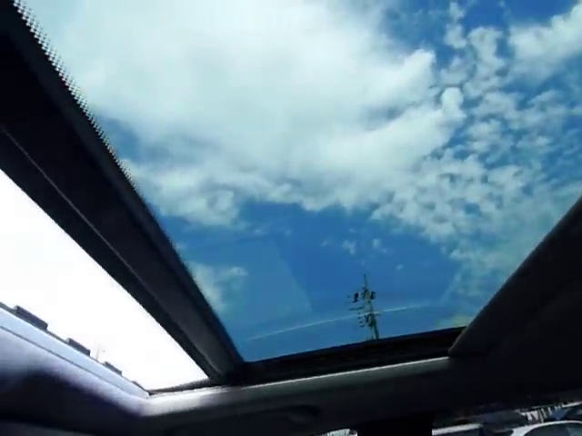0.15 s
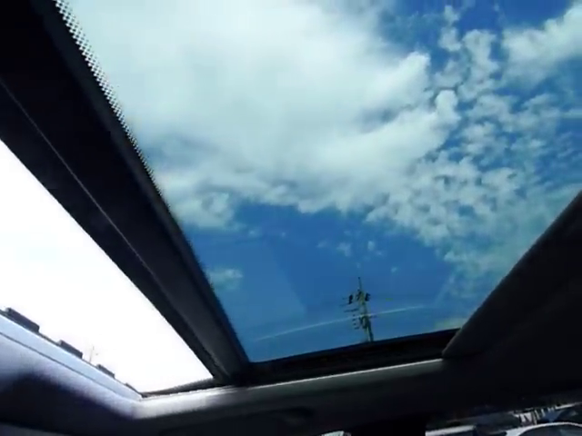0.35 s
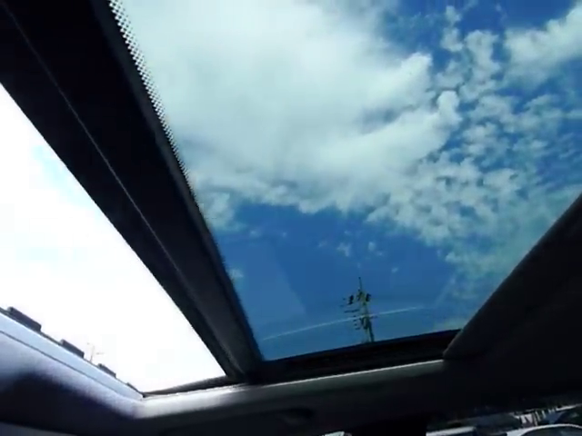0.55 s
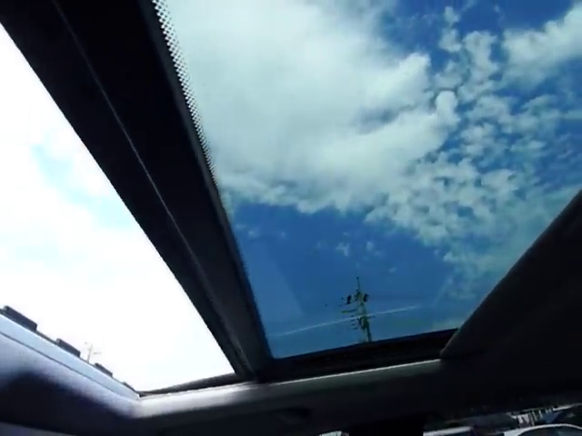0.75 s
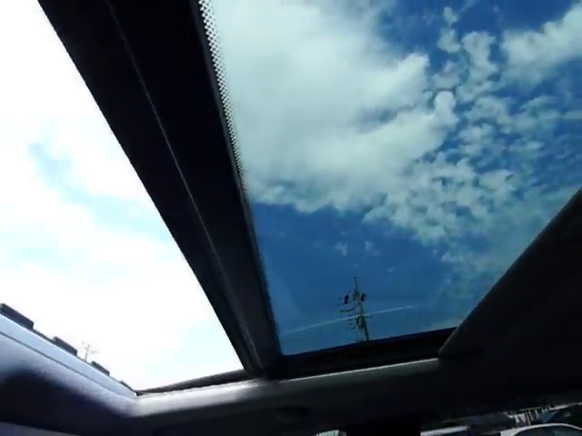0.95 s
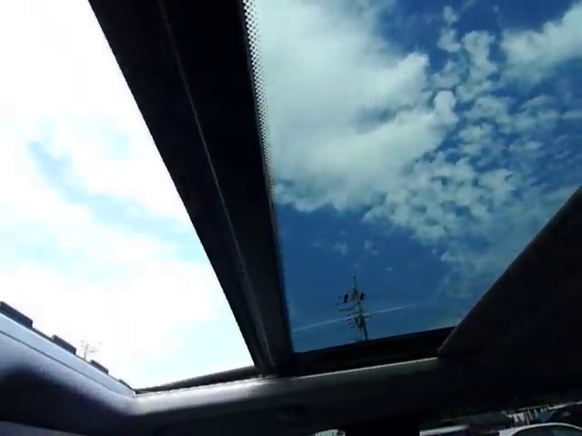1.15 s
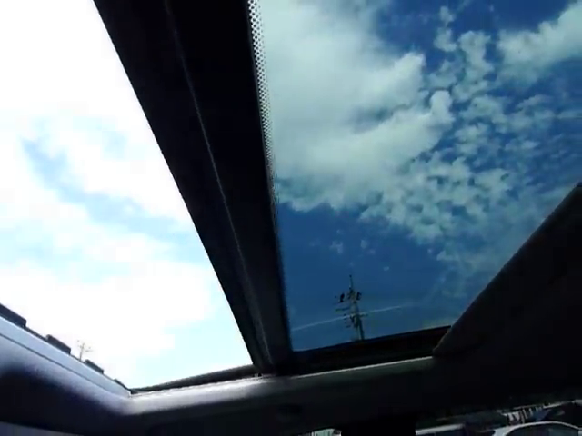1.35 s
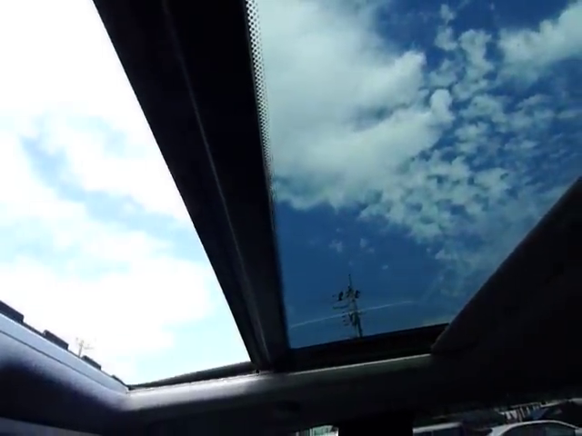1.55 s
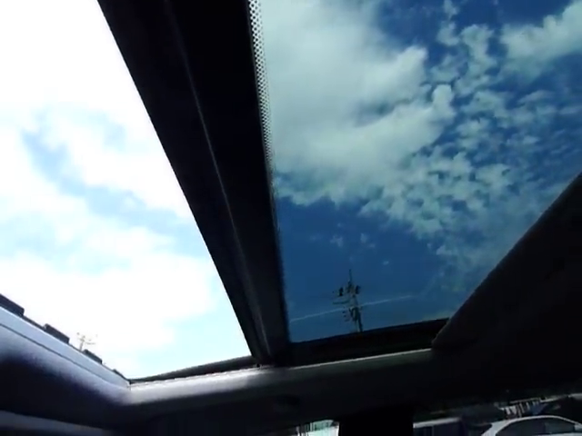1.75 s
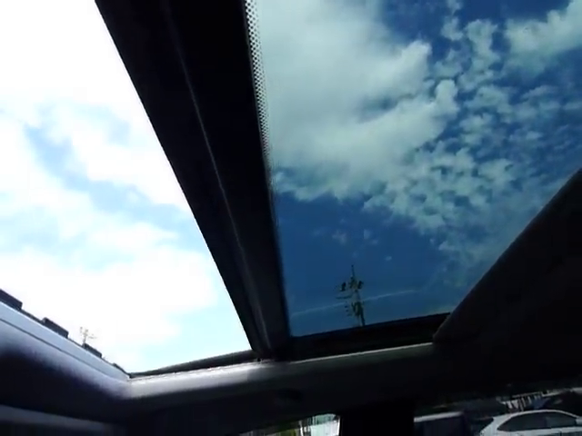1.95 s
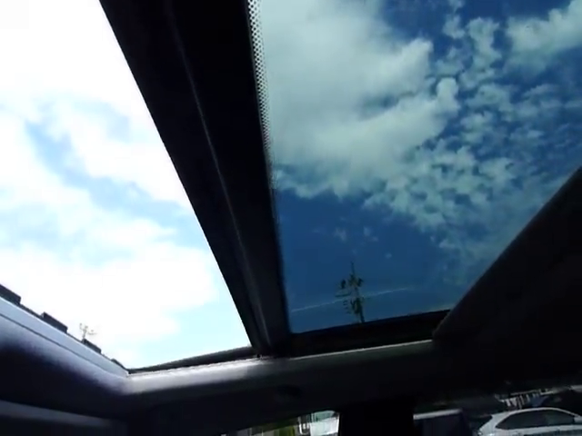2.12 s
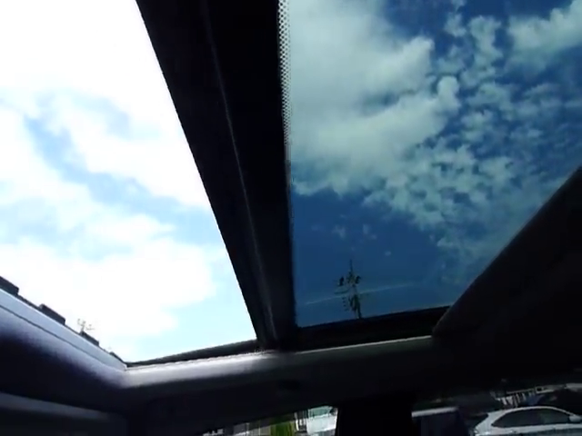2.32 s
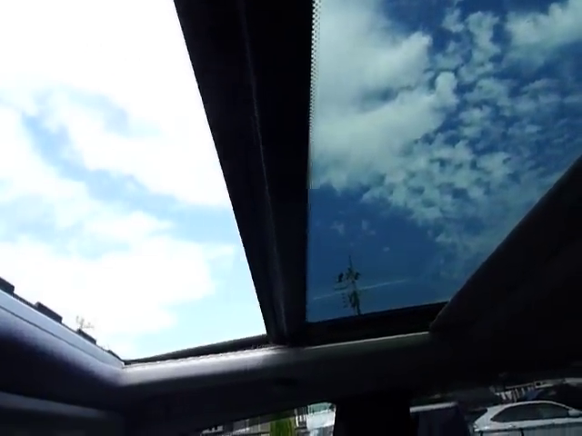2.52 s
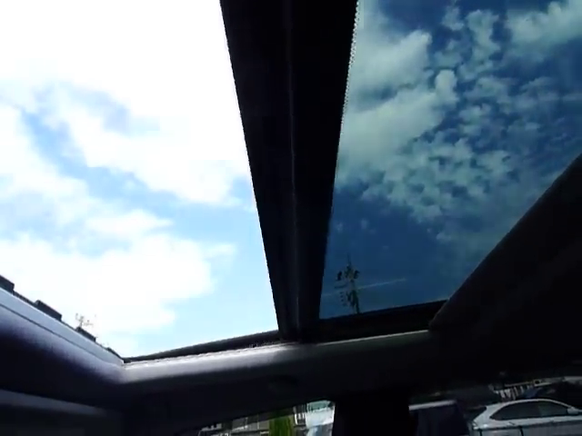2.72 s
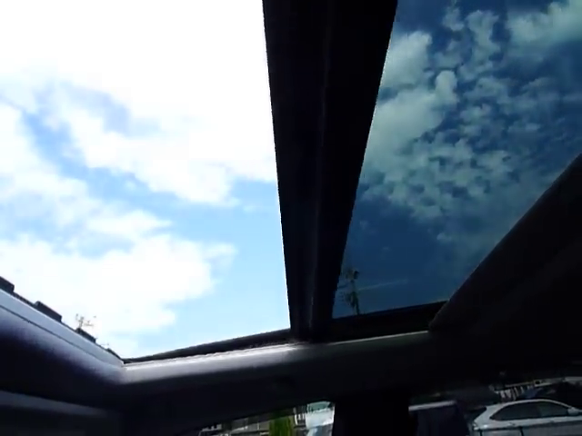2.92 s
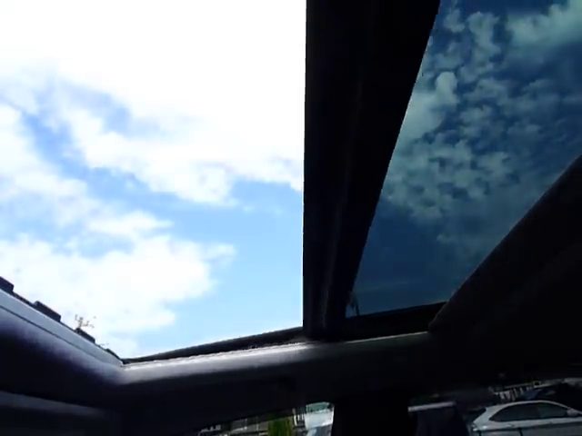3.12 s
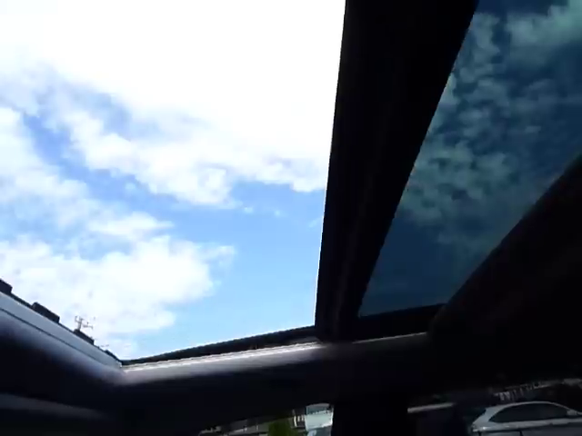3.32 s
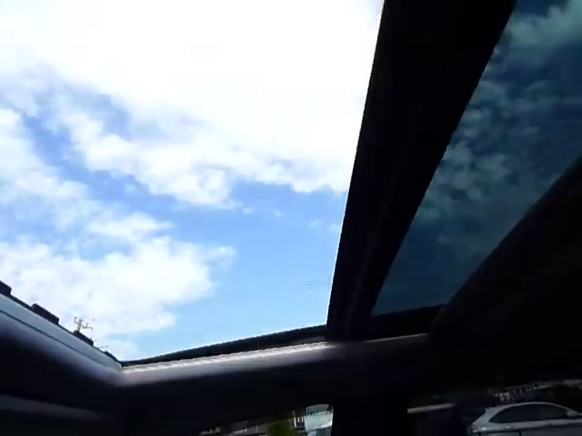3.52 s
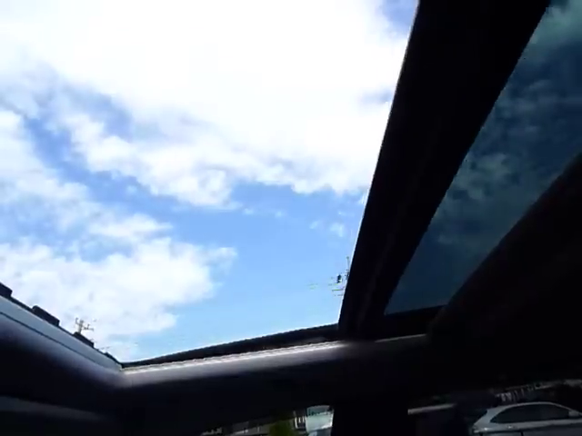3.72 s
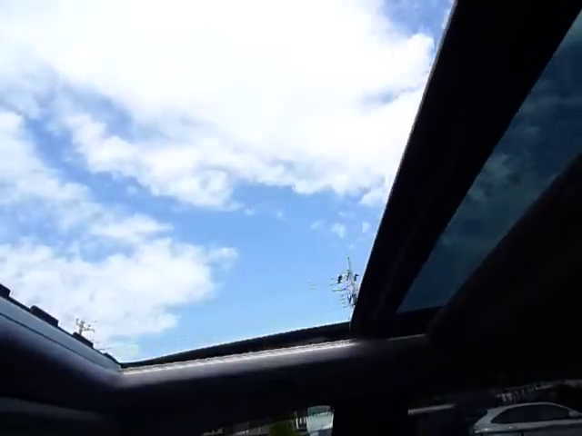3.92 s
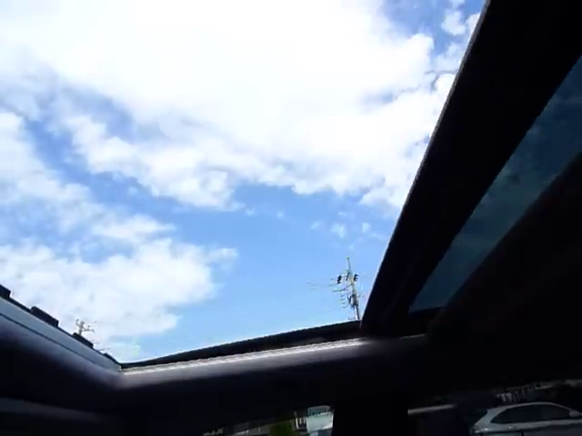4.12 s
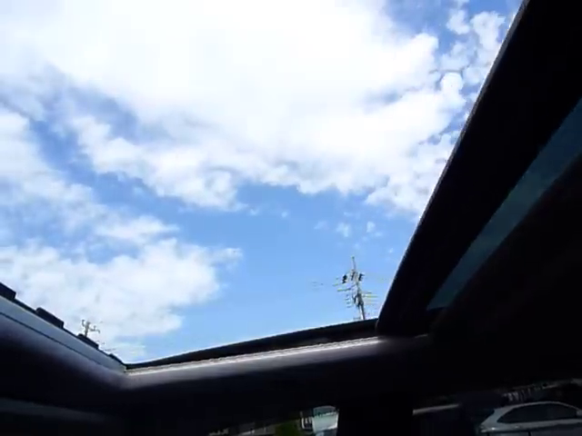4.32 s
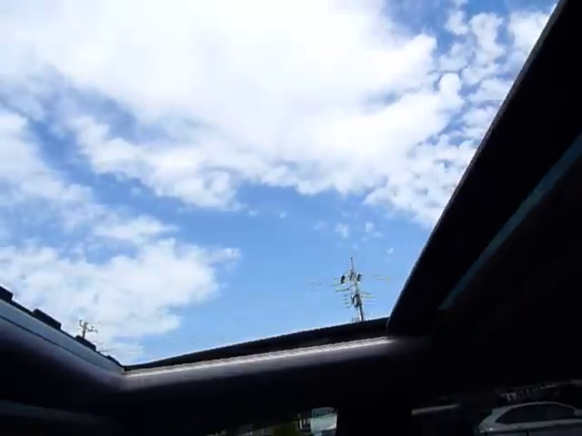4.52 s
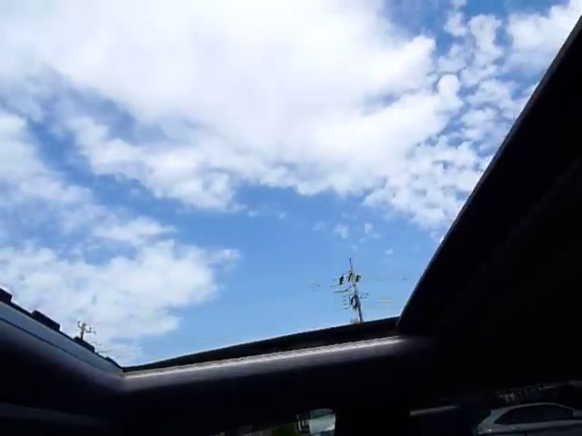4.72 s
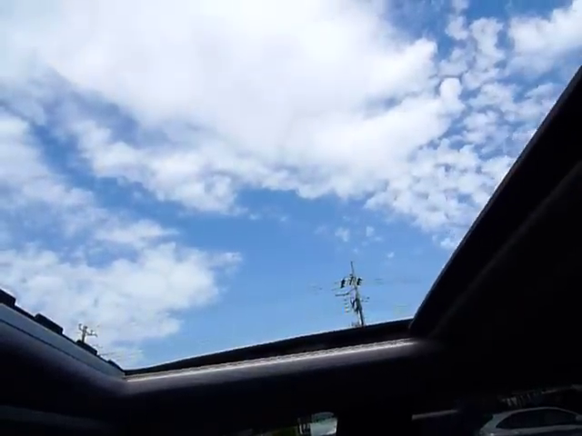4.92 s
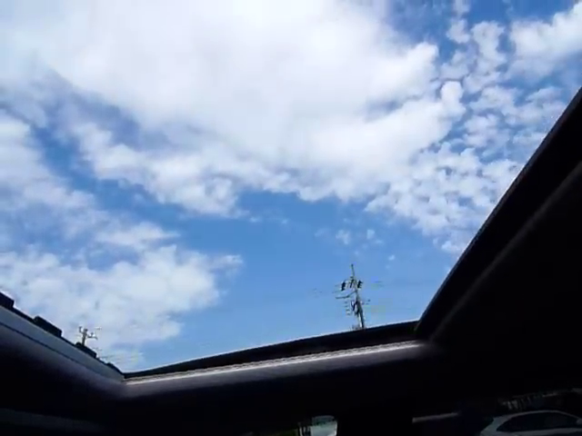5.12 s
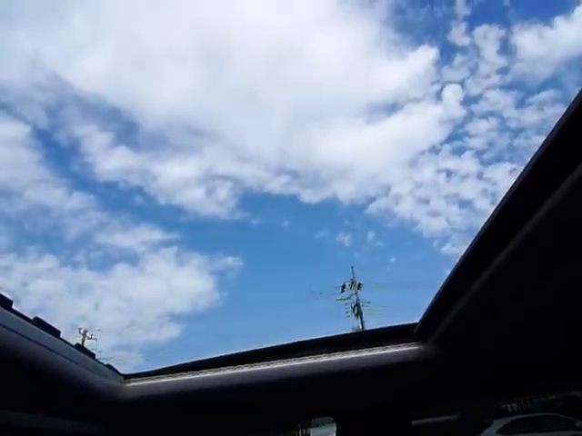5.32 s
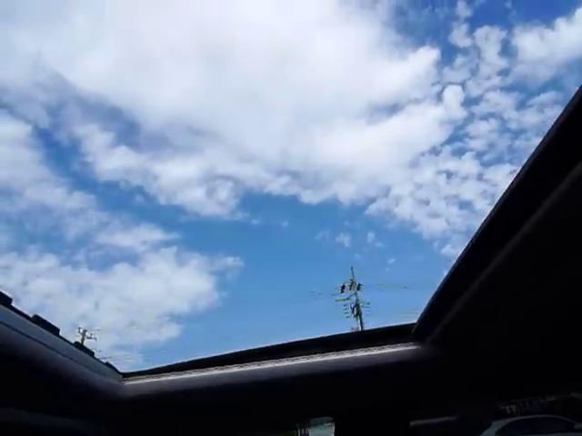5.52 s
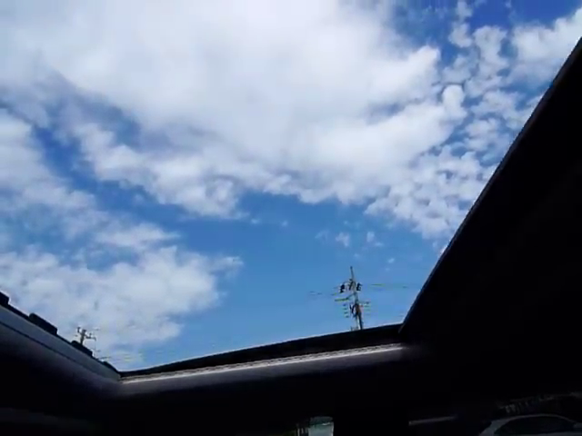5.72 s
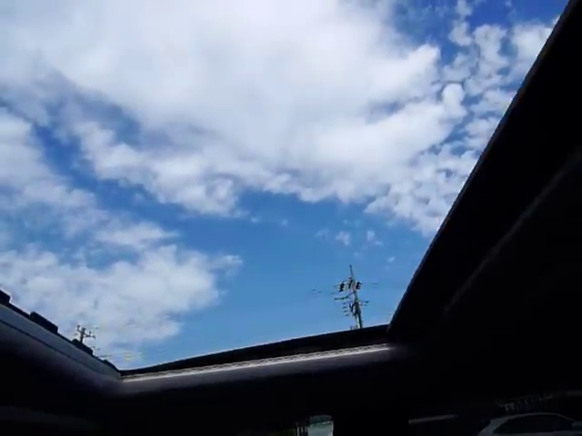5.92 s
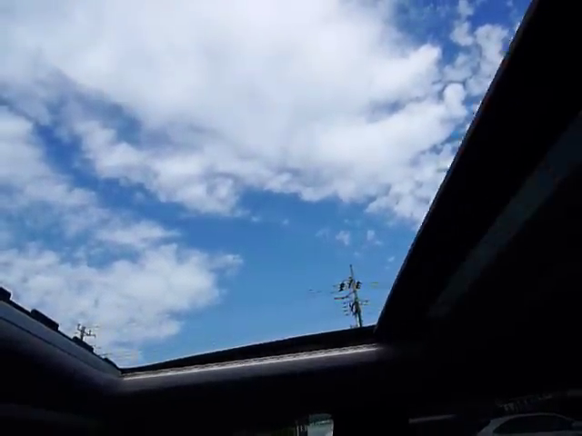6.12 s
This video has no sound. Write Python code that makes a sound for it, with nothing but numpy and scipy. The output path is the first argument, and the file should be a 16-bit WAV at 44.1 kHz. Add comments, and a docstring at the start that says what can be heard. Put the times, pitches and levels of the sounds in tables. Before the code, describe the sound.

A car engine idles with a steady low hum throughout, heard from the seat under a sliding glass roof. From the start, the roof's electric motor whines over a low rumble and a gritty rail hiss, with a click near 0.4 seconds and light seal scrapes. It stops with a soft bump at 1.2 seconds. Around 2.2 seconds the glass thumps softly several times and the motor restarts. Catches click at 2.5 seconds, most sharply at 3.2, and again around 4, where the whine sags and recovers. The hiss gradually fades, and the motor stops with another bump at about 5 seconds. A small bird chirps faintly outside at 5.2 seconds. A cluster of knocks and clicks comes near 5.5 seconds, then the motor runs again, rising slightly in pitch, until the end at about 6.4 seconds.

```python
"""Inside an idling car, a panoramic glass roof slides open in three runs of its electric motor.
The gear whines and sags under load, its housing rumbles, and the shoes hiss in their rails.
Catches click and knock in the frame, seals scrape, and the glass thumps in its seat.
The engine hums underneath; in the second pause a small bird chirps faintly outside."""
import sys
import numpy as np
from scipy import signal
from scipy.fft import rfft, irfft, next_fast_len
from scipy.io import wavfile
from scipy.ndimage import map_coordinates

SR = 44100
rng = np.random.default_rng(int(sys.argv[2]) if len(sys.argv) > 2 else 0)


def int16_out(signal):
    """Quantize to a 16-bit WAV file."""
    q = np.round(np.clip(np.atleast_2d(signal).T, -1, 1) * 32767)
    wavfile.write(sys.argv[1], SR, q.astype(np.int16))


N = 276066

# when the motor is on: start/s, stop/s
MOTOR_RUNS = [(0, 1.229), (2.25, 5.054), (5.56, 6.4)]


def amp(db):
    """Decibels to gain."""
    return 10 ** (np.asarray(db) / 20)


def unit(x):
    """Scale to rms 1."""
    return x / np.sqrt(np.mean(x ** 2) + 1e-20)


def along(points, hz):
    """Read a curve of (f/Hz, value) points on a log frequency axis."""
    f, value = np.transpose(points)
    return np.interp(np.log(hz + 1), np.log(f + 1), value)


def curves(rows):
    """Breakpoints to automation: one curve for each column after the time."""
    times, *columns = np.transpose(rows)
    return [np.interp(np.arange(N) / SR, times, column) for column in columns]


def wobble(rate, size=N):
    """A smooth random curve with rate knots a second."""
    knots = rng.standard_normal(int(size * rate / SR) + 4)
    return map_coordinates(knots, [np.arange(size) * rate / SR])


def filtered(x, response):
    """Zero-phase EQ; response gives the gain at each frequency."""
    size = next_fast_len(N + SR // 2)
    return irfft(rfft(x, size) * response(np.fft.rfftfreq(size, 1 / SR)), size)[:N]


def coloured(x, spectrum):
    """x through an EQ curve of (f/Hz, level/dB) points, at rms 1."""
    return unit(filtered(x, lambda hz: amp(along(spectrum, hz))))


def snap(spectrum, size=2048):
    """The tightest causal pulse with this spectrum (minimum phase), at energy 1."""
    cepstrum = irfft(np.log(amp(along(spectrum, np.fft.rfftfreq(size, 1 / SR)))))
    cepstrum[1:size // 2] *= 2
    cepstrum[size // 2 + 1:] = 0
    pulse = irfft(np.exp(rfft(cepstrum)))
    return pulse / np.linalg.norm(pulse)


def engine():
    """Idle hum on slightly drifting revs, over a steady bed of cabin noise."""
    # partials of the idle hum: f/Hz, level/dB
    partials = [(36.6, -55.5), (110, -59), (137.4, -49), (276, -60.5), (549, -58.5)]
    # engine and street noise in the cabin: f/Hz, relative level/dB
    cabin_eq = [(18, -27.5), (36, -12), (55, -15), (85, -16.5), (150, -6.5), (230, -10.5), (330, -9.5),
                (450, -12.5), (560, -11.5), (950, -17), (1100, -20), (1500, -26), (1780, -23.5),
                (2400, -27), (3200, -30), (3900, -38.5), (4600, -42.5), (8500, -44.5)]
    clock = np.cumsum(1 + 0.004 * wobble(3.055)) / SR  # the revs wander
    hum = sum(amp(db + 0.64 * wobble(6.7)) * np.sin(2 * np.pi * (hz * clock + rng.random()))
              for hz, db in partials)
    bed = amp(-44.5 + 0.42 * wobble(7.2)) * coloured(rng.standard_normal(N), cabin_eq)
    return np.sqrt(2) * hum + bed


def bird():
    """Three tiny whistled notes, each dipping in pitch and rising again."""
    # the bird's notes: t/s, lowest f/Hz, level/dB
    notes = [(5.23, 3600, -61), (5.244, 3680, -56), (5.262, 3420, -49)]
    note_s, bend_hz = 0.023, 500
    position = np.linspace(-1, 1, int(note_s * SR))
    swell = (1 - position ** 2) ** 2
    out = np.zeros(N)
    for start, low_hz, db in notes:
        cycles = np.cumsum(low_hz + bend_hz * position ** 2) / SR
        out[round(start * SR):][:len(swell)] += amp(db) * swell * np.sin(2 * np.pi * cycles)
    return out


def contact(start, panel_hz, panel_db, knock_db, click_db, bright_hz, drag_s):
    """One hit rings the panel, knocks the frame and clicks; each layer's dB is ahead of a fixed trim."""
    # roof frame modes: f/Hz, relative level/dB, t60/s
    frame_modes = [(628, -3.5, 0.054), (725, -2, 0.019), (901, -1.5, 0.023), (1324, -7.5, 0.041)]
    # click of hard plastic: f/Hz, relative level/dB
    plastic_eq = [(80, -39), (300, -14.5), (600, 3.5), (1200, 2.5), (2000, 2), (2900, -1.5), (3400, -5.5),
                  (4000, -10), (4600, -15), (5000, -29.5), (5400, -38.5), (6200, -41), (8000, -57.5)]
    t = np.arange(SR // 4) / SR
    cycles = panel_hz * t
    waver = 0.6 * wobble(0.5 * panel_hz, size=len(t))
    panel = np.sin(2 * np.pi * cycles + waver) * amp(-60 * cycles / 23)  # low thuds ring longest
    panel *= 1 - np.exp(-(cycles / 0.67) ** 2)  # soft attack
    knock = sum(amp(db + rng.normal(0, 0.53) - 60 * t / t60)
                * np.sin(2 * np.pi * (hz * rng.normal(1, 0.037) * t + rng.random()))
                for hz, db, t60 in frame_modes)
    knock *= 1 - np.exp(-(t / 0.00061) ** 2)
    # a dragging contact smears into a scrape, and the cabin scatters it
    cabin_tail = 0.26 * amp(-60 * t / 0.067)
    smear = (1 - np.exp(-t / drag_s)) * (np.exp(-t / (2 * drag_s)) + cabin_tail)
    scatter = rng.standard_normal(len(t)) * smear
    scatter /= np.linalg.norm(scatter)
    scatter[0] += 1.4 * np.exp(-drag_s / 0.0014)  # a hard contact arrives as one spike
    click = signal.fftconvolve(scatter / np.linalg.norm(scatter), snap(plastic_eq))[:len(t)]
    click = signal.lfilter(*signal.butter(3, min(bright_hz, SR / 4), fs=SR), click)
    hit = amp(panel_db + 0.5) * panel + amp(knock_db - 6) * knock + amp(click_db + 13) * click
    return np.pad(hit, (round(start * SR), N))[:N]


def seals():
    """Seals and guides slip briefly: light, dragging contacts that barely ring the roof."""
    # slips: t/s, relative level/dB, brightness/Hz
    slips = [(.528, -21.5, 2100), (.815, -25.5, 6000), (1.785, -31.5, 2320), (1.902, -29.5, 4500),
             (2.147, -33, 1610), (2.186, -22, 3030), (3.614, -20, 3960), (4.045, -23.5, 3970),
             (5.408, -27.5, 3000), (5.421, -31, 3000), (5.513, -16.5, 1600)]
    return sum(contact(start, panel_hz=332, panel_db=db - 9.5, knock_db=db - 11.5,
                       click_db=db, bright_hz=bright_hz, drag_s=0.0032)
               for start, db, bright_hz in slips)


def glass_panel():
    """Cushioned hits: the glass thumps as the linkage takes up load, and jolts when the motor stops."""
    # thumps in the seat: t/s, panel f/Hz, relative panel level/dB, relative click level/dB
    seatings = [(1.906, 282, -31, -39), (2.166, 280, -27.5, -22), (2.2156, 310, -20.5, -13),
                (2.226, 271, -22.5, -20.5), (2.242, 330, -22, -12), (2.258, 189, -24.5, -35),
                (2.286, 158, -26.5, -34), (2.310, 179, -27, -31), (3.618, 235, -29, -38),
                (5.481, 336, -18.5, -19.5), (5.531, 256, -20.5, -17), (5.545, 311, -16, -28),
                (5.562, 190, -28, -42)]
    # double bump of a stop: delay/s, panel f/Hz, relative panel level/dB, relative knock level/dB
    bumps = [(0, 414, -22, -24.5), (.006, 286, -22, -40)]
    # weight of the first and the second stop: gain/dB
    stop_gains = [-2, 0.5]
    thumps = sum(contact(start, hz, db, db - 5, click_db, bright_hz=2030, drag_s=0.0051)
                 for start, hz, db, click_db in seatings)
    jolts = sum(amp(stop_db)
                * contact(stop + delay, hz, db, knock_db, click_db=-26, bright_hz=1600, drag_s=0.003)
                for (_, stop), stop_db in zip(MOTOR_RUNS, stop_gains)
                for delay, hz, db, knock_db in bumps)
    return thumps + jolts


def catches():
    """Catches snap over: short, hard contacts that knock the frame."""
    # snaps: t/s, relative click level/dB, brightness/Hz, panel f/Hz, relative panel level/dB
    snaps = [(0.427, -13.5, 2540, 449, -17.5), (2.544, -13.5, 3200, 444, -22),
             (3.225, -6.5, 7000, 564, -19), (3.933, -17.5, 2880, 458, -23.5),
             (4.070, -17, 3560, 1190, -18.5), (4.08, -16, 2380, 902, -17), (5.469, -23.5, 1900, 317, -27.5),
             (5.5223, -14, 3440, 772, -7)]
    return sum(contact(start, panel_hz, panel_db, panel_db - 2.5, click_db, bright_hz, drag_s=0.00063)
               for start, click_db, bright_hz, panel_hz, panel_db in snaps)


def running(coast_s, spin_up_s=0.043):
    """Gate that is 1 while the motor is on, with a ramp up before each run and a coast after it."""
    t = np.arange(N) / SR
    return sum(np.clip((t - start) / spin_up_s + 1, 0, 1) * np.clip((stop - t) / coast_s + 1, 0, 1)
               for start, stop in MOTOR_RUNS)


def housing_rumble(rail_db):
    """The gear housing shakes, more so when the shoes rub harder."""
    # housing rumble: f/Hz, relative level/dB
    housing_eq = [(120, -24.5), (200, -1.5), (330, 1.5), (520, 2), (800, 0), (1300, -4), (2500, -43)]
    level_db = -44.5 + 0.21 * (rail_db - np.mean(rail_db)) + 0.8 * wobble(14)
    return amp(level_db) * coloured(rng.standard_normal(N), housing_eq)


def rail_hiss(turns, rail_db):
    """Gritty friction of the shoes; a share of it comes round again with every turn of the shaft."""
    # shoes sliding in the rails: f/Hz, relative level/dB
    rail_eq = [(150, -31.5), (300, -10), (520, -7.5), (800, -10), (1080, -15.5), (1280, -7.5), (1450, -14),
               (1650, -9), (1950, -11.5), (2300, -15.5), (3300, -19), (3850, -28.5), (4400, -38),
               (5500, -52.5), (7000, -81)]
    repeat_share, points = 0.19, 820
    surface = np.interp(turns % 1, np.arange(points) / points, rng.standard_normal(points))
    friction = np.sqrt(repeat_share) * unit(surface) + np.sqrt(1 - repeat_share) * rng.standard_normal(N)
    grit = amp(1.1 * wobble(700) + 0.66 * wobble(50))
    return amp(rail_db) * coloured(friction * grit, rail_eq)


def gear_gain(hz):
    """A partial swells as it glides through the resonances of the drive."""
    # drive resonances: f/Hz, width/Hz, level/dB
    resonances = [(432.5, 47, -41.5), (478, 60, -40), (814.6, 49, -40), (868, 16, -55), (933, 81, -46.5),
                  (1200, 170, -54.5), (1290, 50, -52), (1440, 120, -65.5)]
    return np.sqrt(sum((amp(db) / (1 + (2 * (hz - centre) / width) ** 2)) ** 2
                       for centre, width, db in resonances))


def gear_whine(mesh_hz, teeth_passed, gain_db):
    """Three harmonics of the meshing teeth; uneven contact makes each flutter and fade."""
    flutter_db, fade_db = 1.77, 0.68
    whine = np.zeros(N)
    for k in (1, 2, 3):
        gain = amp(gain_db + flutter_db * wobble(55) + k * fade_db * wobble(12))
        whine += gear_gain(k * mesh_hz) * gain * np.sin(2 * np.pi * k * teeth_passed)
    return np.sqrt(2) * whine


def roof_drive():
    """The motor's speed steers whine, hiss and rumble; the housing rings on longest after a stop."""
    # motor speed, sagging where the roof runs stiffly: t/s, gear mesh f/Hz
    speed = [(0, 435.7), (.4, 441.5), (.7, 429), (.88, 426), (.98, 412.6), (1.23, 411), (2.25, 423),
             (2.8, 428.5), (3.22, 437), (3.6, 411.3), (3.74, 449), (3.92, 443), (4.085, 382), (4.27, 441),
             (4.7, 426), (5.06, 395), (5.56, 441.5), (6.1, 487), (6.26, 481)]
    # the hiss fades as the roof slides away: t/s, hiss level at the usual speed/dB, whine gain/dB
    travel = [(.35, -40.5, .5), (.65, -39, -2.5), (.9, -39, 0), (2.5, -38.5, -2), (3.5, -40, -2),
              (4.35, -43, 0.5), (4.75, -44.6, 0.5), (5.6, -49, -3)]
    teeth, speed_jitter = 8, 0.002995
    usual_mesh_hz, hiss_db_per_octave = 427.4, 14.5
    mesh_hz, = curves(speed)
    slide_db, whine_db = curves(travel)
    teeth_passed = np.cumsum(mesh_hz * (1 + speed_jitter * wobble(45))) / SR
    rail_db = slide_db + hiss_db_per_octave * np.log2(mesh_hz / usual_mesh_hz)  # faster is louder
    return (running(coast_s=0.016) * gear_whine(mesh_hz, teeth_passed, whine_db)
            + running(coast_s=0.02) * rail_hiss(teeth_passed / teeth, rail_db)
            + running(coast_s=0.055) * housing_rumble(rail_db))


def scene():
    """The mono mix, heard from the seat under the roof."""
    return (engine() + roof_drive() + catches() + glass_panel() + seals() + bird())[None]


def record(dry):
    """Master EQ: the deepest bass rolls off and the top end is cut steeply."""
    low_hz, top_hz, silent_above_hz = 20, 7850, 8870

    def band(hz):
        low_cut = hz ** 2 / np.sqrt(hz ** 4 + low_hz ** 4)
        high_cut = (hz < silent_above_hz) / np.sqrt(1 + (hz / top_hz) ** 50)
        return low_cut * high_cut

    return filtered(dry[0], band)[None]


dry = scene()
out = record(dry)
int16_out(out)
```